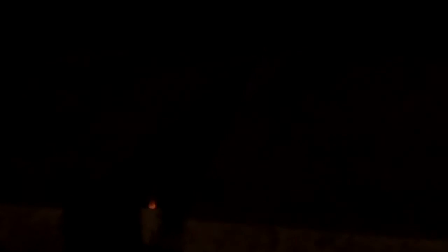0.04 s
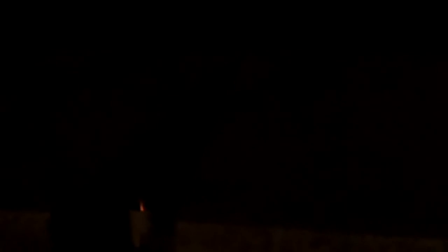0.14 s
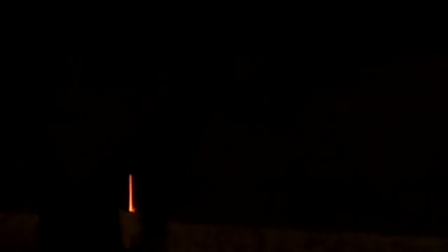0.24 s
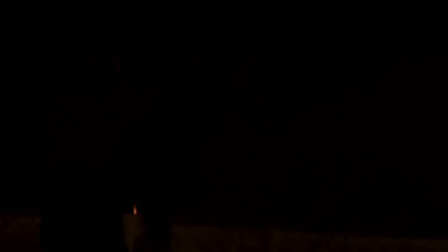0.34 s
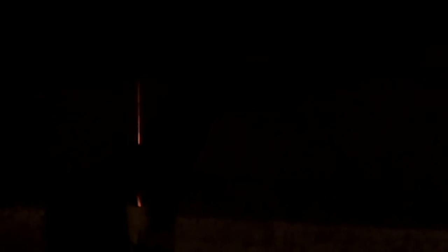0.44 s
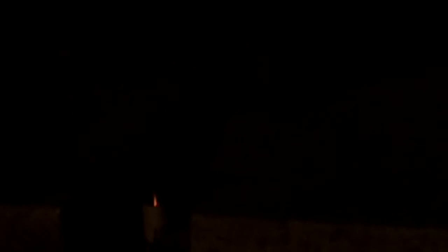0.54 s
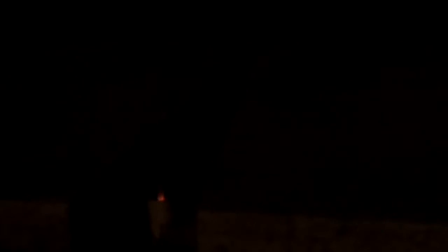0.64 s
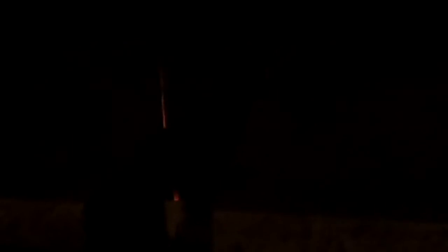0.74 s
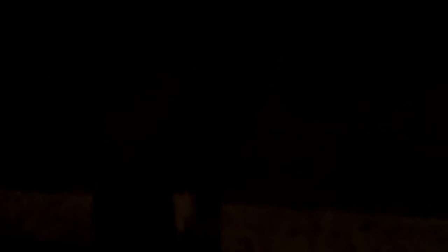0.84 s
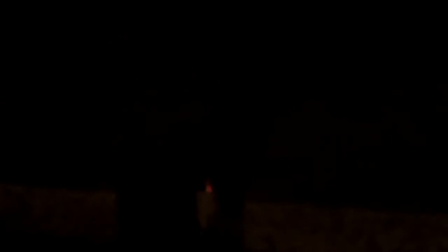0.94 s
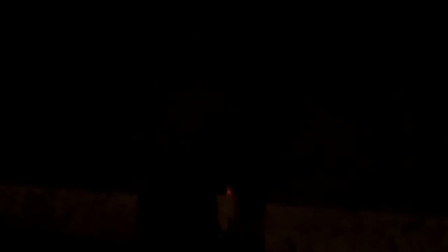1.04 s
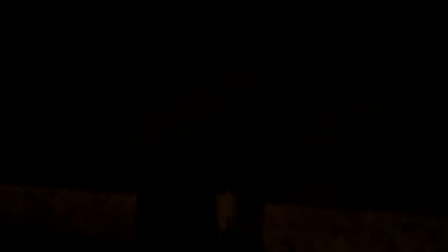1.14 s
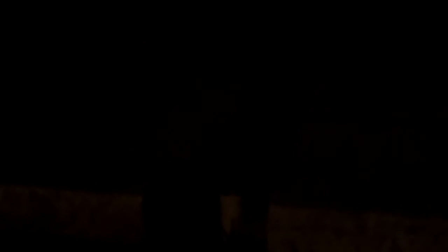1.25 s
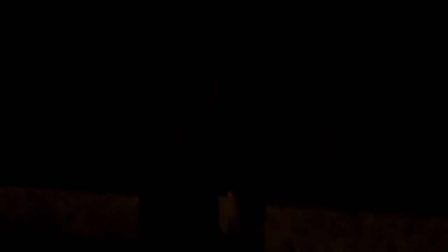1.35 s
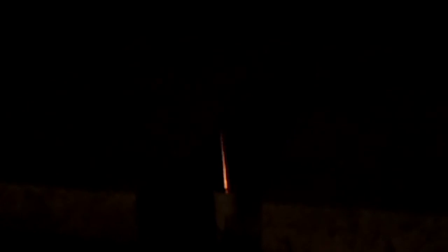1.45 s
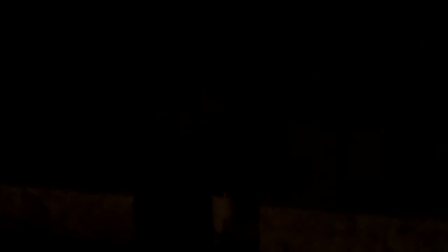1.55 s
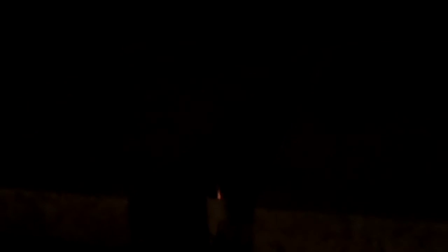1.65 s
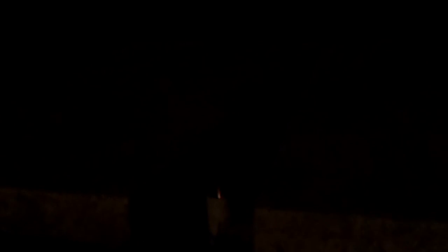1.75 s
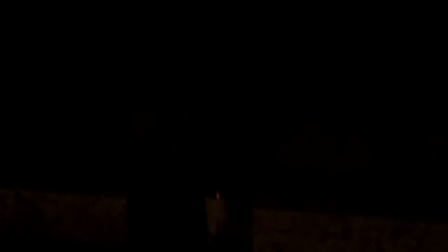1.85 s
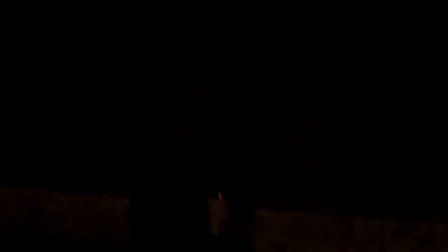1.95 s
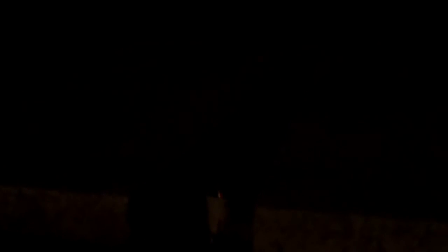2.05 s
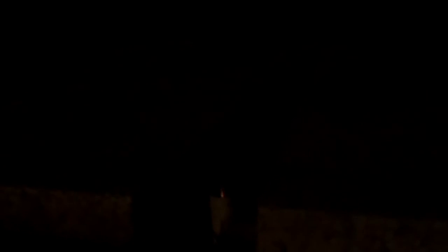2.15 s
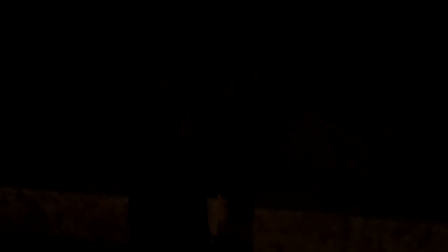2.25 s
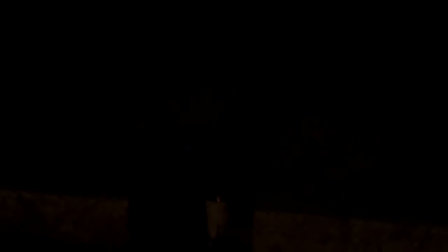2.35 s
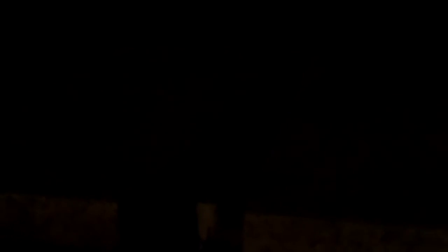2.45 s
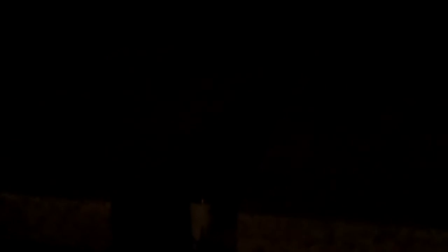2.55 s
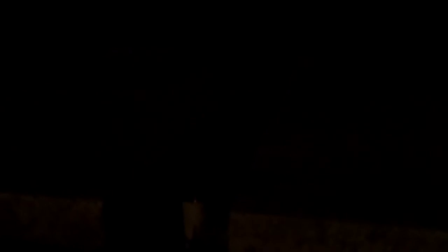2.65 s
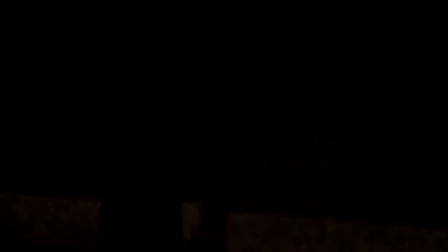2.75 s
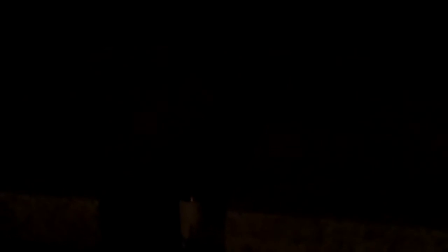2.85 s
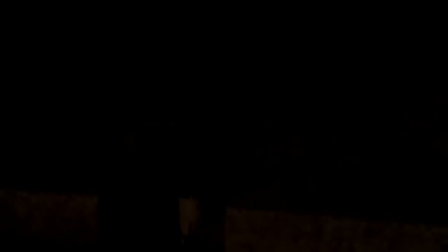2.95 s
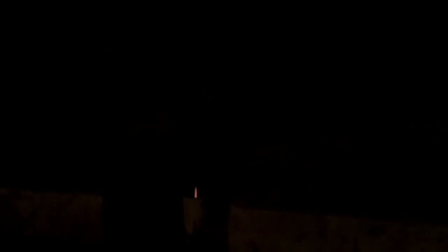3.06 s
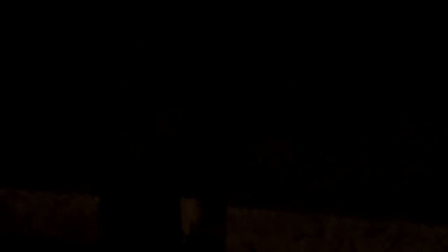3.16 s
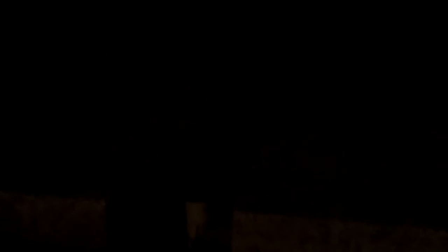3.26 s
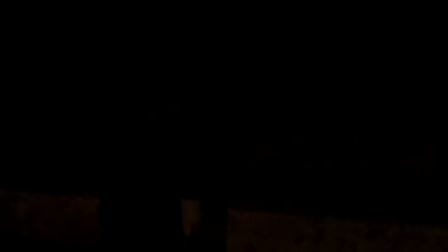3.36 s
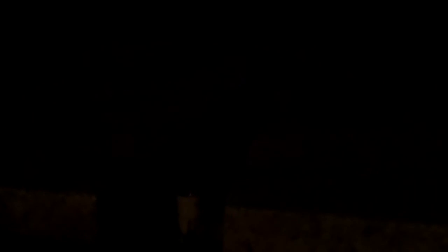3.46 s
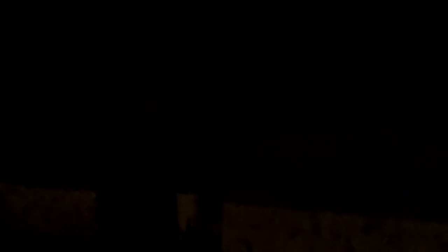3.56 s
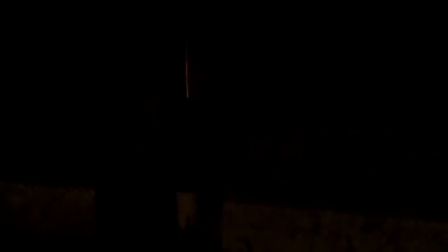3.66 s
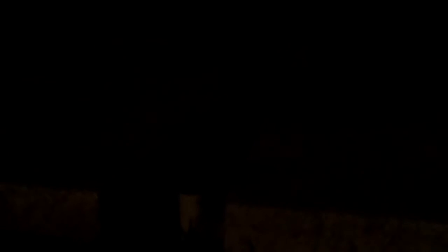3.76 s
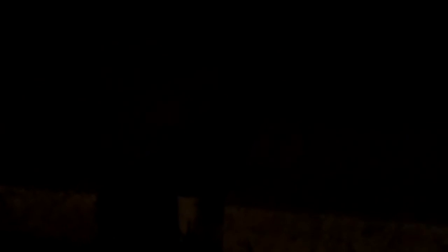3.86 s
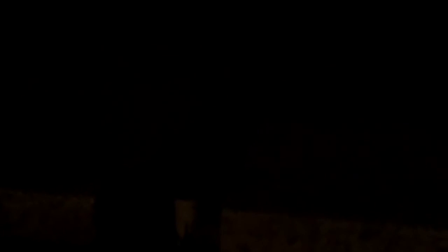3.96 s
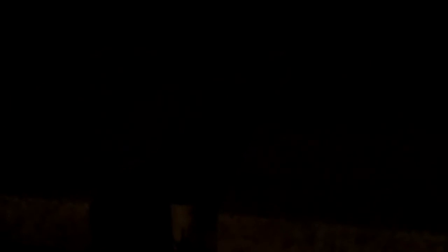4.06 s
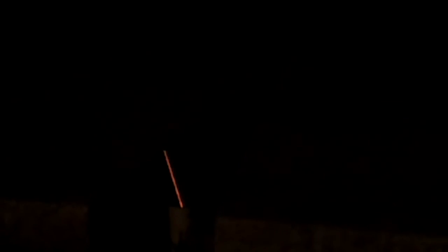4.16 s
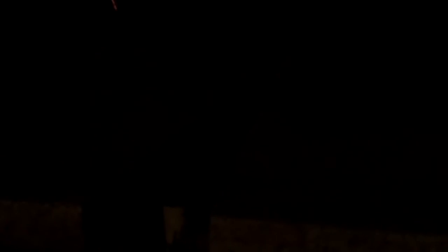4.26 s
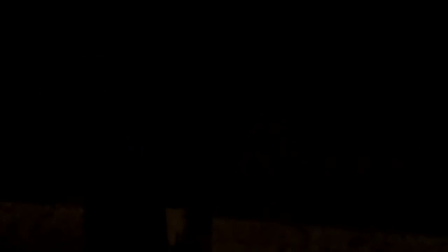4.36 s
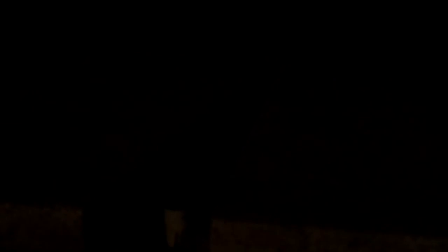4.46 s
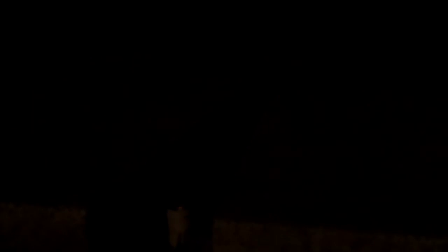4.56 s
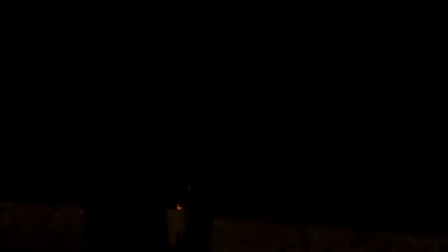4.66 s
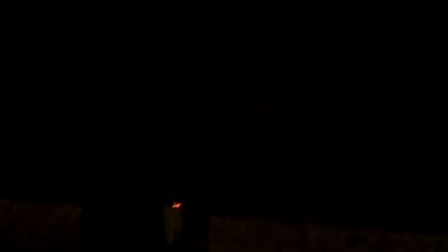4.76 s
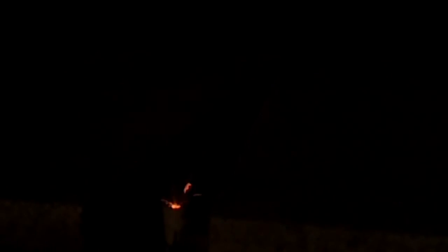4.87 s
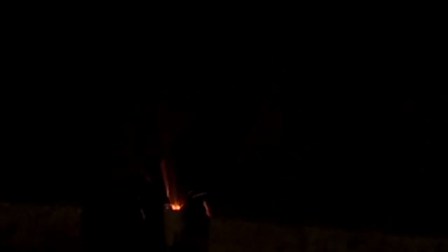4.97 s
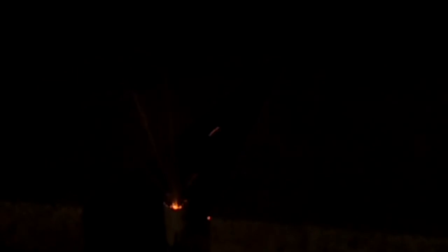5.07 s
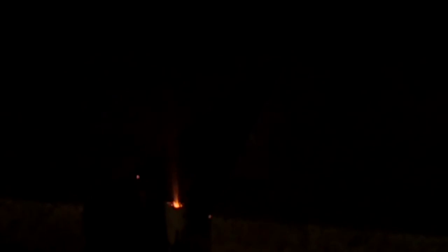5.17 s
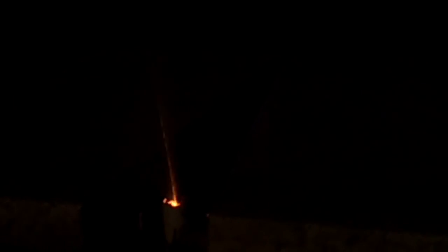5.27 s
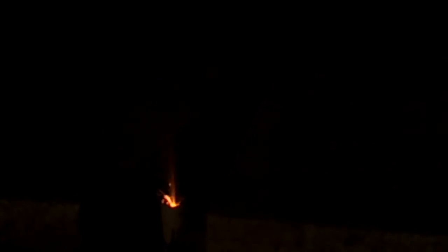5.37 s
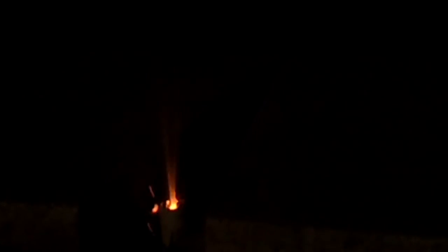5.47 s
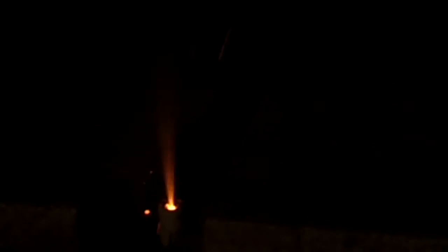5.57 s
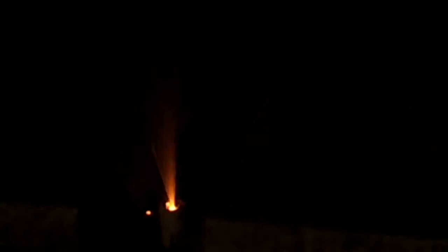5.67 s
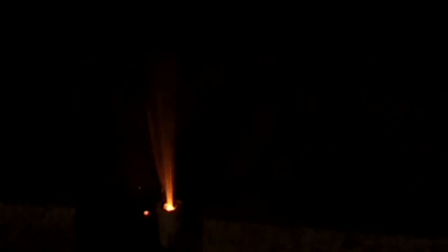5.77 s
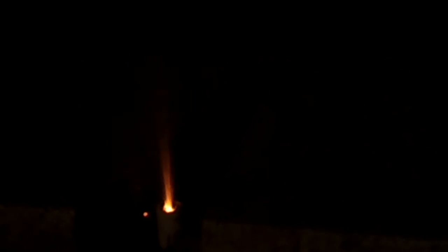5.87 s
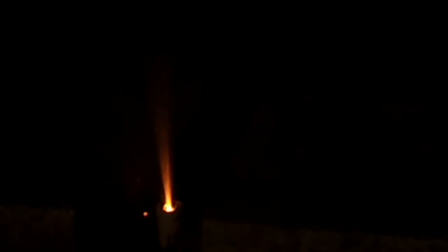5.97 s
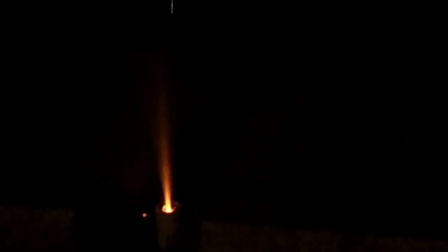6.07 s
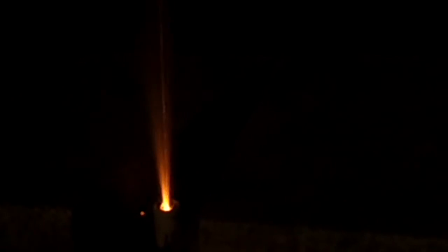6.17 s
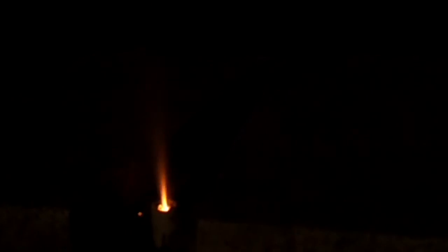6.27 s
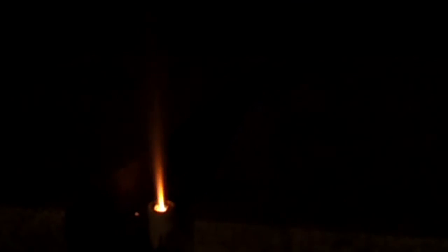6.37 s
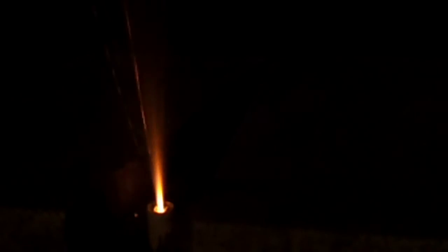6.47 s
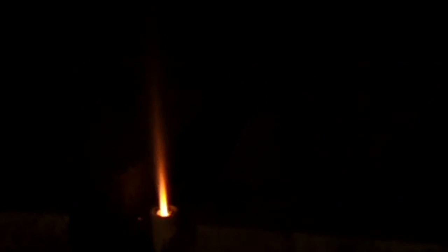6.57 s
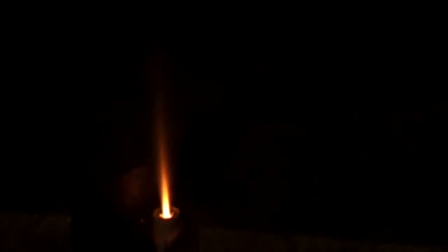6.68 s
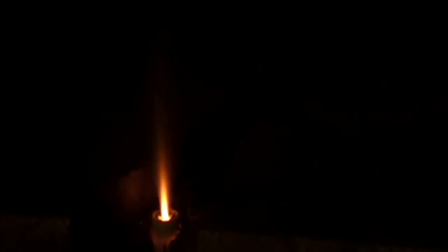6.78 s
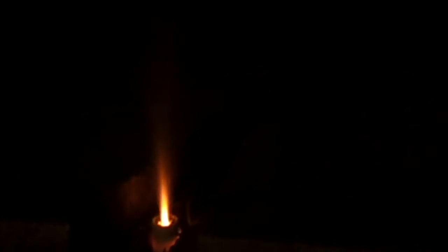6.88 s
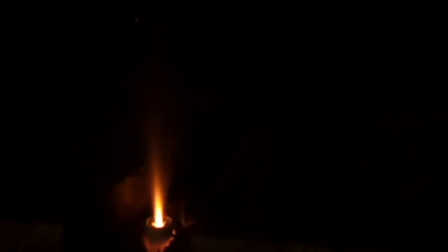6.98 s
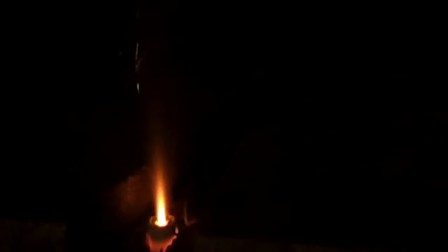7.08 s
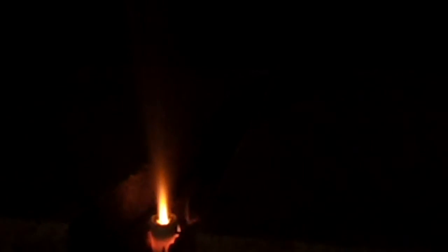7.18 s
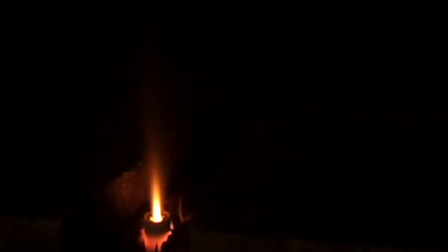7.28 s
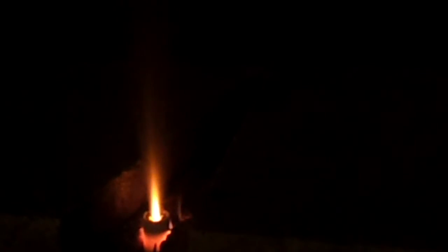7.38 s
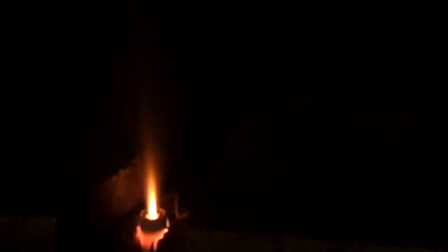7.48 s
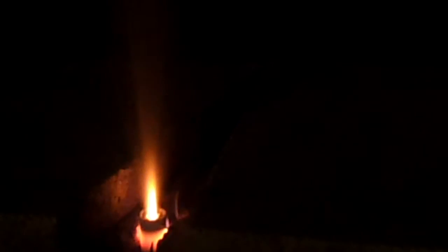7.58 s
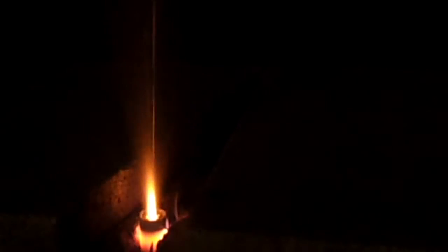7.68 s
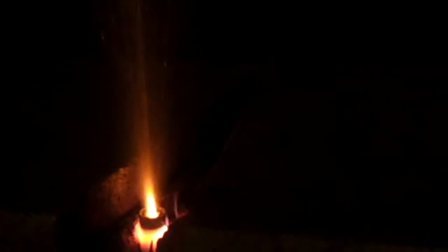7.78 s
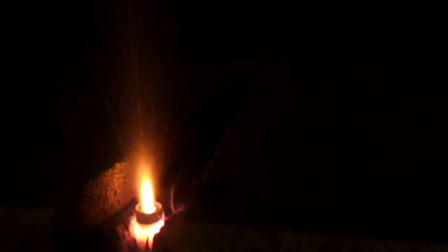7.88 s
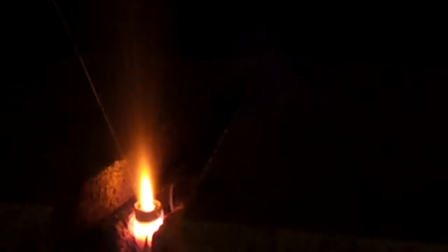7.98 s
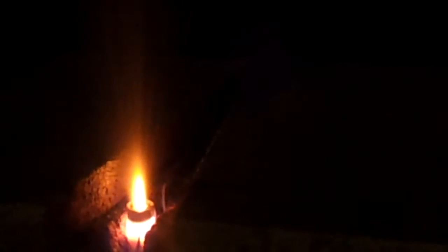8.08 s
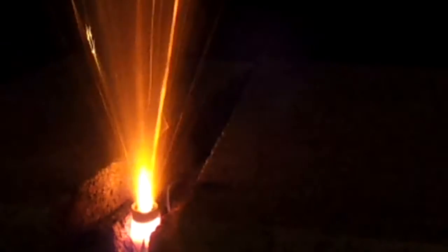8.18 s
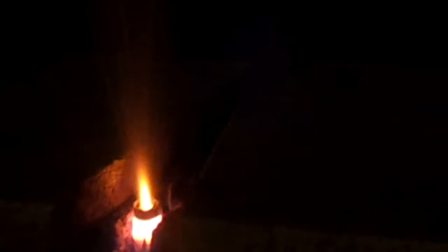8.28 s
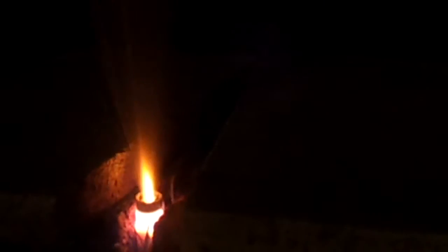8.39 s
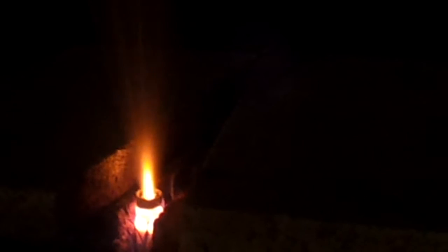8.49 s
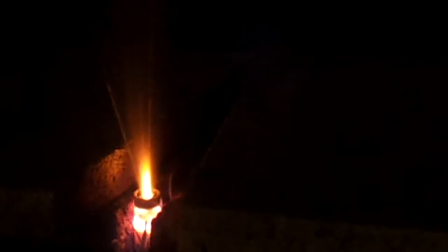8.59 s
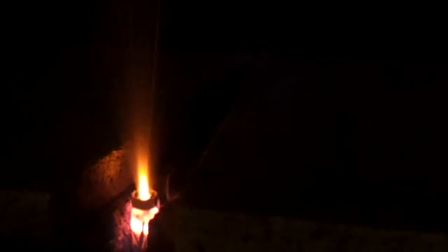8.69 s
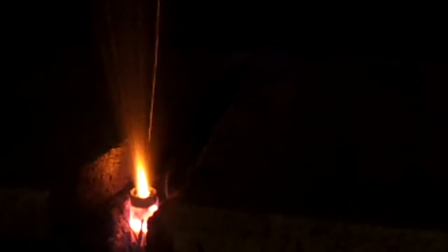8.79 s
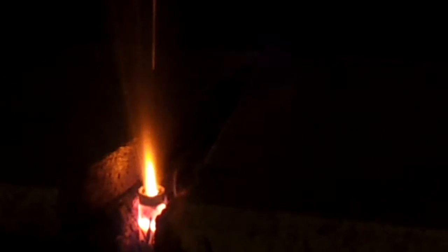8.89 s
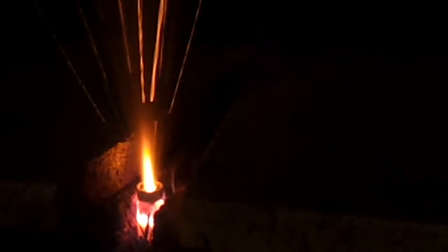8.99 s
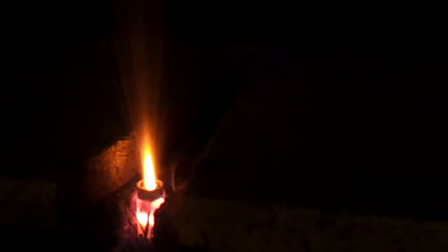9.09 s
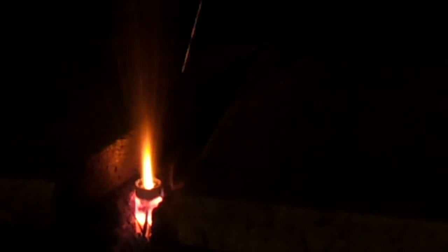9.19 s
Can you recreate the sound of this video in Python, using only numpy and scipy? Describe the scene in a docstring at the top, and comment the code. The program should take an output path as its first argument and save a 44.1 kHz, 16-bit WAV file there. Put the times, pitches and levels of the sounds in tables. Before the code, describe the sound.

Night outdoors, with a low murmur of far traffic and passing engines. Close by, a thin, bright gas hiss sputters and slowly strengthens, its ringing edge sinking in pitch. A few sharp pops crack as the flame catches around five seconds, then a throaty roar surges up quickly and holds, wide and steady, with deep buffeting rumble; the dull-topped microphone overloads.

```python
"""On the ground at night, a home-made solid rocket motor burns, with far traffic behind it.
Gas rushing through the nozzle makes shaped noise: it hisses and sputters, then sizzles in a broad band
that sinks as the throat wears wider. Bursting grains add a few short pops around the time the flame catches.
The flame's noise swells into a steady roar with a deep rumble, which overloads the microphone."""
import sys
import numpy as np
from scipy import signal
from scipy.fft import rfft, irfft, next_fast_len
from scipy.io import wavfile

SR = 44100
rng = np.random.default_rng(int(sys.argv[2]) if len(sys.argv) > 2 else 0)


def unload_wav(signal):
    """Save mono or channel-first audio to the path in sys.argv[1] as 16-bit WAV at rate SR, clipped to [-1, 1]."""
    wavfile.write(
        sys.argv[1],
        SR,
        np.round(np.clip(np.atleast_2d(signal).T, -1, 1) * 32767).astype(np.int16),
    )


N = 407043
TIME = np.arange(N) / SR  # seconds


def gain_of(db):
    """Turns decibels into a factor on the sound's amplitude."""
    return 10 ** (np.asarray(db) / 20)


def evened(x):
    """Scales a sound to an average (rms) strength of 1."""
    return x / np.sqrt(np.mean(x ** 2) + 1e-20)


def read(points, hz):
    """Reads a spectrum in dB, joining its points by straight lines over log frequency."""
    point_hz, db = np.transpose(points)
    return np.interp(np.log(hz + 1), np.log(point_hz + 1), db)


def follow(rows, t=TIME):
    """Reads a curve at the times t, joining its points by straight lines."""
    seconds, values = np.transpose(rows)
    return np.interp(t, seconds, values)


def coloured(x, points):
    """Makes each frequency of a sound stronger or weaker, as a spectrum says."""
    size = next_fast_len(N + 4096)  # spare room, so the end does not wrap onto the start
    hz = np.fft.rfftfreq(size, 1 / SR)
    shaped = rfft(x, size) * gain_of(read(points, hz))
    return irfft(shaped, size)[:N]


def noise(points):
    """Random noise of rms 1 with a given spectrum."""
    return evened(coloured(rng.standard_normal(N), points))


def flutter(low_hz, high_hz):
    """Random wavering of rms 1, with equal power in each octave between two rates."""
    slope_db = -10 * np.log10(high_hz / low_hz)
    return noise([(low_hz / 2, -30), (low_hz, 0), (high_hz, slope_db), (high_hz * 2, -70)])


def bump(hz, centre, width):
    """A bell of height 1 over frequency."""
    return np.exp(-.5 * ((hz - centre) / width) ** 2)


def ramp(start_s, length_s):
    """Rises evenly from 0 to 1."""
    return np.clip((TIME - start_s) / length_s, 0, 1)


def surge(s, length_s):
    """A smooth rise and fall of height 1 around a moment."""
    return np.exp(-2 * ((TIME - s) / length_s) ** 2)


# Far engines that swell and fade, one per row; the pitch is the one at full level:
# (full from [s], fades from [s], pitch [Hz], glide [Hz/s], level [dB])
FAR_ENGINES = [(0, .35, 160, 14, -52.5), (.7, 1.2, 170.5, 9.5, -61), (.7, 1.0, 82, 0, -57),
               (2.3, 2.4, 94.6, 0.5, -52.5), (3.5, 3.6, 93, -0.5, -52), (3.099, 5.2, 120.1, -1, -49.8)]
ENGINE_RISE_S, ENGINE_FADE_S = 0.22, 0.57


def engine(start, end, hz, glide, db, throb_db=1.0):
    """Of a far engine only the firing note carries: a sine wave, wavering slightly on the way."""
    waver = 1 + .006 * flutter(low_hz=2, high_hz=8)
    turns = np.cumsum((hz + glide * (TIME - start)) * waver) / SR
    note = np.sqrt(2) * np.sin(2 * np.pi * turns)  # rms 1
    heard = ramp(start - ENGINE_RISE_S, ENGINE_RISE_S) * (1 - ramp(end, ENGINE_FADE_S))
    return heard * gain_of(db + throb_db * flutter(low_hz=1.9, high_hz=8)) * note


# Spectrum of the far roads: (frequency [Hz], relative level [dB])
TRAFFIC_SPECTRUM = [(15, -5), (40, -5.5), (65, -2), (95, 2), (140, -2.5), (190, -7.5), (260, -14),
                    (400, -18.5), (540, -17), (950, -12), (1300, -15.5), (1800, -22), (3000, -23),
                    (9000, -46)]


def traffic(level_db=-47.0):
    """Far roads blend into a low murmur of noise, with single engines standing out."""
    murmur = gain_of(level_db) * noise(TRAFFIC_SPECTRUM)
    return murmur + sum(engine(*row) for row in FAR_ENGINES)


# Burning grains that burst at the nozzle, one per row: (time [s], crack level [dB], pitch [Hz])
POP_EVENTS = [(1.76, -29, 4500), (4.979, -18, 5000), (5.148, -13, 4500), (5.174, -9, 4500),
              (5.5385, -5.5, 2700)]


def pops(puff_db=-17, puff_s=0.00048):
    """Each bursting grain gives a crack of a cycle or two and a small low puff."""
    out, cycles = np.zeros(N), .75
    for s, db, hz in POP_EVENTS:
        near = abs(TIME - s) < .01
        t = TIME[near] - s
        crack = np.cos(2 * np.pi * hz * t) * np.exp(-(hz * t / cycles) ** 2)
        puff = -2 * t / puff_s * np.exp(-(t / puff_s) ** 2)
        out[near] += gain_of(db) * (crack + gain_of(puff_db) * puff)
    return out


# Gas flow through the nozzle, given as the basic level of the hiss: (time [s], level [dB])
GAS_FLOW = [(0.0, -39.5), (1.51, -36.5), (2.41, -33.5), (2.47, -35.5), (2.85, -29), (3.47, -32),
            (3.83, -29.5), (4.47, -28.5), (4.52, -31), (5.55, -23.5), (6.27, -13), (9.23, -12.5)]
FULL_FLOW_DB = -12.5


def flow_db():
    """The gas flow drives hiss, roar and rumble together."""
    return follow(GAS_FLOW)


def thrust_db():
    """Gas flow compared with the full burn, which is 0 dB."""
    return flow_db() - FULL_FLOW_DB


SPREADS_S, SPREADING_S, SMALLEST_SIZE = 5.98, .3, 0.14


def flame_size(t=TIME):
    """The flame spreads from a small jet at the nozzle (near 0) to a full plume (1), ever more slowly."""
    still_to_grow = np.exp(-np.maximum(t - SPREADS_S, 0) / SPREADING_S)
    return np.clip(1 - (1 - SMALLEST_SIZE) * still_to_grow, 0, 1)


# The flame flares (+) and sags (-); the rumble takes only a part of each change:
# (time of the middle [s], time to nearly die away on each side [s], change of the roar [dB])
FLAME_FLARES = [(6.03, .28, 1.8), (6.6, 0.23, 1.6), (7.1, 0.32, -0.5), (8.093, 0.45, 1)]


def flare_db():
    """Slow flaring and sagging of the flame lifts and lowers the level."""
    return sum(db * surge(s, length) for s, length, db in FLAME_FLARES)


LENGTHENS_S, LENGTHENING_S = 6.68, 1.06
# Spectrum of the largest eddies: (frequency [Hz], relative level [dB])
RUMBLE_SPECTRUM = [(10, 3.5), (25, -4.5), (60, -0.5), (110, 0), (240, 0), (400, -5), (700, -3), (2000, -35),
                   (9000, -61.5)]


def rumble(level_db=-25.5, growth=2.5, long_flame_db=5.0, flaring=.4, gust_db=0.7):
    """The largest eddies grow steeply with the flow and the flame's length, and come in short buffets."""
    db = level_db + growth * thrust_db()
    db = db + long_flame_db * ramp(LENGTHENS_S, LENGTHENING_S) + flaring * flare_db()
    buffets_db = gust_db * flutter(low_hz=6.6, high_hz=25)
    return gain_of(db + buffets_db) * noise(RUMBLE_SPECTRUM)


# Brief spurts (+) and chokes (-) of the gas: (time [s], change [dB])
GAS_SPURTS = [(.863, -6), (.978, 4.5), (1.03, -2.5), (1.395, -2.5), (1.545, 2.5), (1.618, -2.5),
              (1.768, 3.5), (2.13, 4), (2.38, 1.5), (3.845, 3), (4.986, 2.5), (5.518, 3.5)]
SPURT_S = .024  # time to nearly die away on each side


def sputter(small_flame_db=.88, full_flame_db=0.09):
    """Unsteady gas flow: fast random flutter that calms as the flame spreads, plus single spurts."""
    depth_db = small_flame_db + (full_flame_db - small_flame_db) * flame_size()
    spurts_db = sum(db * surge(s, SPURT_S) for s, db in GAS_SPURTS)
    return gain_of(depth_db * flutter(low_hz=13, high_hz=220) + spurts_db)


def gas(grains_per_s=450, grain_spread_db=3.5, small_flame_db=-10.0, full_flame_db=-21):
    """Smooth turbulence sprinkled with tiny bursting grains, which a full flame drowns."""
    sizes = np.minimum(rng.exponential(1, N), 4)  # mostly small, now and then large
    bursts = rng.random(N) < grains_per_s / SR
    grains = gain_of(grain_spread_db * sizes) * bursts
    grit_db = small_flame_db + (full_flame_db - small_flame_db) * flame_size()
    return rng.standard_normal(N) + gain_of(grit_db) * evened(grains)


# The throat's resonance holds its pitch, then sinks as the throat erodes
THROAT_HZ, ERODES_S, EROSION_S, SAG_HZ_PER_S = 6150, 3.02, 1.7, 570
# Basic spectrum of the hiss: (frequency [Hz], relative level [dB])
HISS_SPECTRUM = [(300, -27), (1500, -25), (2100, -19.5), (2700, -16), (3250, -8.5), (3900, -6),
                 (4600, -3.5), (5300, -2), (5750, -1.5), (6150, -1.6), (6550, -3), (7100, -3), (9000, -3.5)]
# Strength of the throat's resonance: (time [s], height [dB])
THROAT_RING = [(0, 2), (1.2, 3.5), (2.7, 8.5), (3.5, 10.5), (4.4, 4), (4.6, -4.5), (6.2, -1)]
# Change of the treble near 8 kHz: (time [s], level [dB])
TREBLE_LEVEL = [(0, 0), (2.2, 8), (3.9, -2.5), (4.55, -9.5), (6.3, 1)]
# Narrow peaks (+) and notches (-) in the treble of the hiss, which fade as the flame grows: # (frequency [Hz],
# width [Hz], height [dB])
TREBLE_RIPPLES = [(3370, 90, 1.5), (5280, 120, 2.5), (5830, 100, -5), (6170, 130, 1), (6740, 60, -3),
                  (6830, 70, 4.5), (7110, 50, 4), (7220, 90, 4), (7520, 50, -4), (7630, 70, 7),
                  (8240, 79, 3.5)]


def hiss(width_hz=650, level_db=0.01, full_hz=6950, full_db=2.5):
    """Gas rushes through a throat whose resonance sinks as it erodes; the full jet adds a bright edge."""
    hz, t, spectra = signal.stft(gas(), SR, nperseg=1024, noverlap=768)
    hz, size = hz[:, None], flame_size(t)
    centre = THROAT_HZ - SAG_HZ_PER_S * np.clip(t - ERODES_S, 0, EROSION_S)
    throat_db = follow(THROAT_RING, t) * bump(hz, centre, width_hz)
    treble_db = follow(TREBLE_LEVEL, t) * bump(hz, 7860, 800)
    edge_db = full_db * size * bump(hz, full_hz, width_hz)
    peaks_db = sum(db * bump(hz, f, width) for f, width, db in TREBLE_RIPPLES)
    ripple_db = peaks_db * .8 * (1 - size)  # a big flame smears the peaks
    shape = gain_of(read(HISS_SPECTRUM, hz) + throat_db + treble_db + edge_db + ripple_db)
    heard = shape * gain_of(read(MICROPHONE_RESPONSE, hz))
    shape = shape / np.sqrt(np.mean(heard ** 2, axis=0))  # the throat changes colour, not loudness
    rush = signal.istft(spectra * shape, SR, nperseg=1024, noverlap=768)[1][:N]
    return gain_of(level_db + flow_db()) * rush


# Hard surfaces beside the motor; a minus sign flips the wave: (delay [s], reflected share)
NEAR_ECHOES = [(.00332, .24), (.00378, -.24)]


def reflected(x):
    """Near surfaces add short echoes that ripple the spectrum."""
    return x + sum(share * np.interp(TIME - delay, TIME, x, left=0) for delay, share in NEAR_ECHOES)


LIGHTS_S, LIGHTING_S = 4.13, 0.92
# Spectra of the small and the full flame: (frequency [Hz], relative level [dB])
SMALL_FLAME_SPECTRUM = [(40, -17), (100, -11), (220, 1), (380, 4), (650, 5), (920, 4.5), (1130, 1),
                        (1400, -1.5), (2000, 1), (2600, 0), (3200, 2.5), (4500, -3.5), (9000, -8)]
FULL_FLAME_SPECTRUM = [(60, -8.5), (200, -8.5), (380, 2.5), (650, -0.6), (920, 2), (1150, 2.5), (1600, 2),
                       (2400, 2), (3200, 2.5), (4500, -1), (6500, -6), (9000, -5)]


def roar(level_db=-13.0, growth=1.587, churn_db=0.88):
    """The plume tears into still air and grows faster than the flow, from throaty to wide and even."""
    size = flame_size()
    small = evened(reflected(noise(SMALL_FLAME_SPECTRUM)))  # echoes ripple only the small flame
    wash = np.sqrt(1 - size) * small + np.sqrt(size) * noise(FULL_FLAME_SPECTRUM)
    churning_db = churn_db * flutter(low_hz=28, high_hz=150)
    db = level_db + growth * thrust_db() + flare_db() + churning_db
    return gain_of(db) * ramp(LIGHTS_S, LIGHTING_S) * wash


def scene():
    """The motor burns in front of the night background."""
    motor = sputter() * (hiss() + roar()) + rumble() + pops()
    return (traffic() + motor)[None]


# How well the microphone hears each pitch: (frequency [Hz], level [dB])
MICROPHONE_RESPONSE = [(20, -0.5), (6600, 0), (7100, -6), (7500, -12.5), (7900, -23), (8400, -25.5),
                       (8850, -30.5), (9200, -49.5), (9700, -78)]
EDGE_HZ = 15800  # almost nothing passes above this


def record(dry, fizz_db=-7):
    """A microphone nearly deaf above 8 kHz; the loudest peaks flatten and spray a thin fizz above that."""
    ceiling, knee = .68, 9  # highest level, and how sharply the peaks bend towards it
    x = coloured(dry[0], MICROPHONE_RESPONSE)
    flat = x / (1 + abs(x / ceiling) ** (2 * knee)) ** (.5 / knee)
    # the distortion loses some treble
    distortion = coloured(flat - x, [(7500, 0), (9000, fizz_db), (16000, fizz_db + 4)])
    edge = signal.firwin(1023, EDGE_HZ, window=("kaiser", 9), fs=SR)
    return signal.oaconvolve(x + distortion, edge, "same")[None]


dry = scene()
out = record(dry)
unload_wav(out)
```